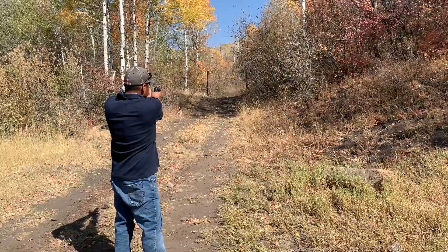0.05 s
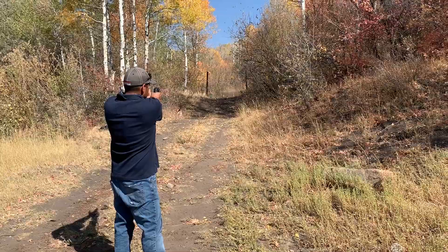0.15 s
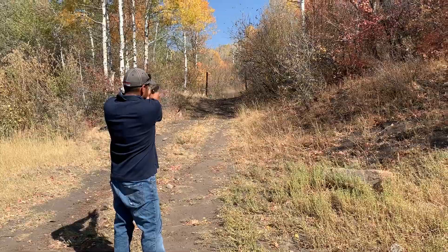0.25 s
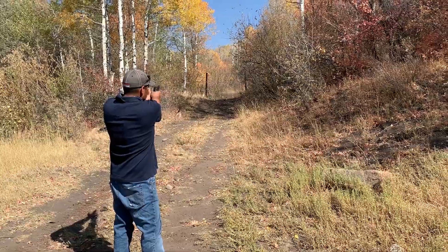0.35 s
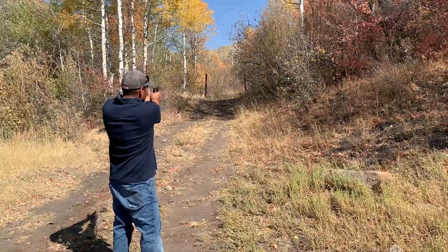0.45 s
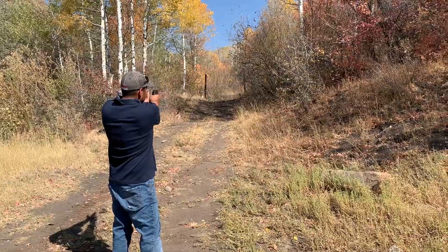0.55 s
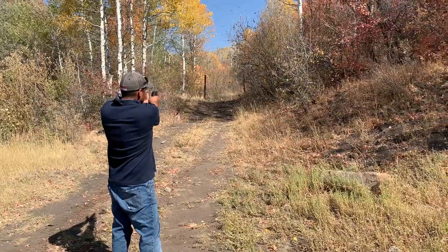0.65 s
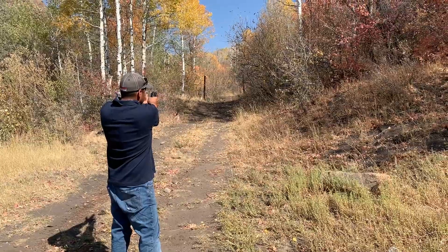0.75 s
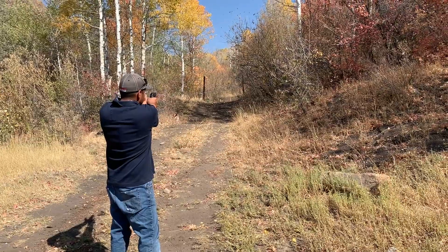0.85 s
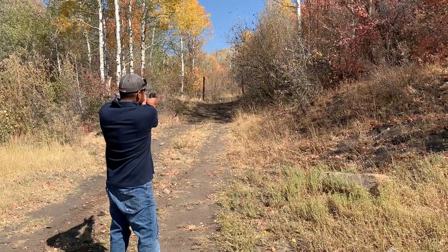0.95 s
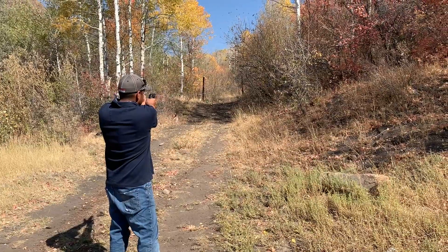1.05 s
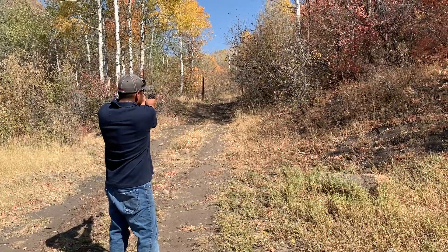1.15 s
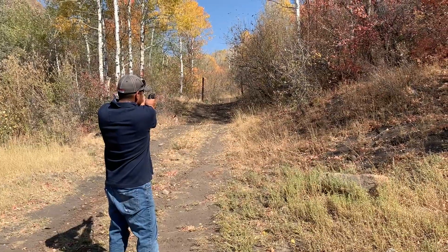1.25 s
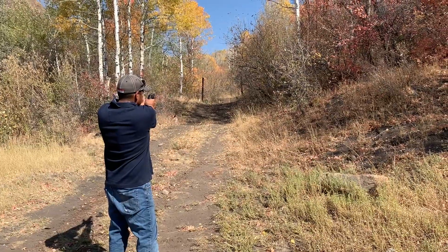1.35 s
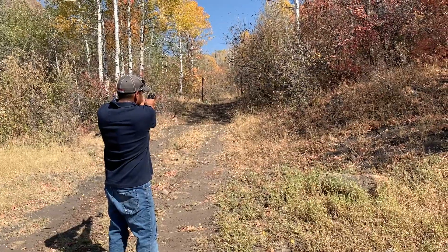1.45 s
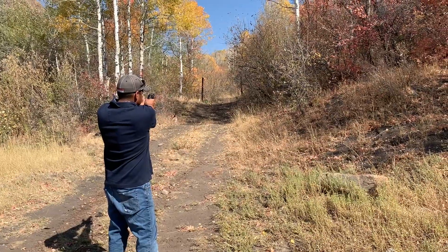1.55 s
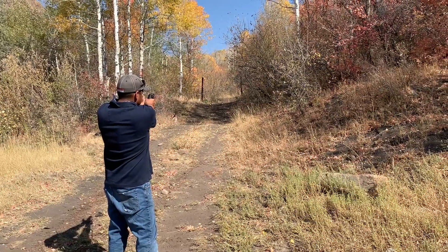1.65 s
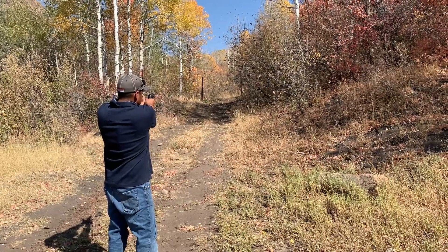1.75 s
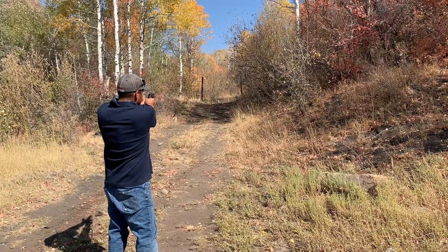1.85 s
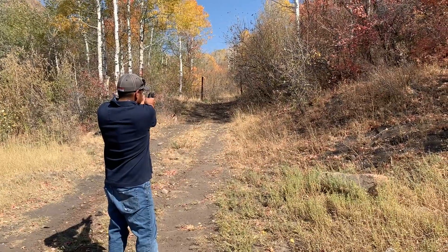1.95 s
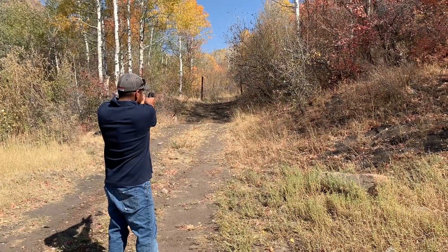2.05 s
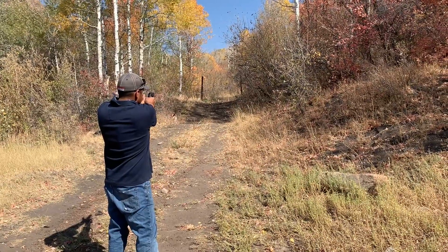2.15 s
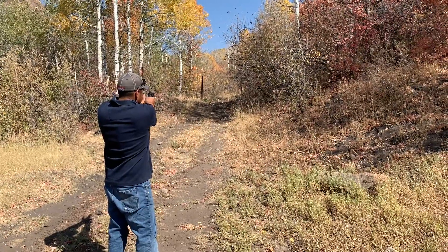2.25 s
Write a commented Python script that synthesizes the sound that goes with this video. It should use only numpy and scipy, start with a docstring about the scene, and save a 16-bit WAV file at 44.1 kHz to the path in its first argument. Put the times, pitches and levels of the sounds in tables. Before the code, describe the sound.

A handgun fires once, just after two quick clicks of its action. The sharp crack and thump, a few metres from the microphone, echo through trees, then a brass casing faintly rings on stone in light wind.

```python
"""Handgun shot on a wooded track

Two sharp clicks of the action, then one shot a few metres from a phone. Its sharp snap and falling
thump overload the microphone; brush, trees and far slopes scatter a long tail. The spent brass case
strikes a stone and rings. Grit and dry grass tick. Light wind buffets the microphone over a faint hiss."""
import sys
import numpy as np
from scipy import signal
from scipy.fft import rfft, irfft
from scipy.io import wavfile

SR = 44100
rng = np.random.default_rng(int(sys.argv[2]) if len(sys.argv) > 2 else 0)


def persist_wave(psi):
    """Save psi, clipped to +-1, as 16-bit WAV."""
    counts = np.round(np.clip(psi, -1, 1) * 32767).astype(np.int16)
    wavfile.write(sys.argv[1], SR, np.atleast_2d(counts).T)


N = 101430

# stereo width of scattered sound (frequency [Hz], side re mid [dB])
STEREO_WIDTH = [(60, -24.5), (250, -9), (600, -3.5), (1200, 2), (3000, 0), (12000, -1)]
# wind on the microphone (time [s], level [dB])
GUST_LEVELS = [(0, -56), (.07, -59), (.11, -52), (.2, -50.5), (.35, -61.5), (.55, -55.5), (0.641, -49),
               (.71, -59), (.78, -53), (.81, -50.5), (0.871, -59.5), (.93, -48), (1.02, -51.5),
               (1.059, -37), (1.101, -54), (1.129, -46), (1.19, -58.5), (1.245, -54.5), (1.29, -63.5),
               (1.54, -65.5), (1.581, -49), (1.66, -71), (1.76, -59), (1.79, -57), (1.92, -61),
               (1.989, -50), (2.04, -55.5), (2.099, -47.5), (2.16, -58.5), (2.24, -53), (2.3, -53)]
# wind rumble (frequency [Hz], level [dB])
WIND_SPECTRUM = [(12, -54), (20, -21.5), (47, -2), (76, 1.5), (235, -22), (274, -26.5), (340, -28),
                 (464, -40.5), (600, -42), (780, -70), (1320, -120)]
# faint hiss (frequency [Hz], level [dB])
HISS_SPECTRUM = [(240, -33.5), (400, -2.5), (987, -13), (2400, -12), (3740, -17), (8150, -17),
                 (11800, -23.5), (13300, -17.5), (15500, -29)]
# faint hiss (time [s], level [dB])
HISS_LEVELS = [(0, -68.5), (0.221, -69.5), (.3, -79.5), (2.3, -82)]
# clicks of the gun's action (time [s], level [dB], decay [s], left re right [dB])
ACTION_CLICKS = [(0.0532, -32, 0.0022, -7.5), (.058, -38, 0.0014, 19), (0.063, -48, 0.0013, -8),
                 (0.1798, -35.5, 0.0022, 0), (0.1841, -43, 0.0025, -2.5)]
# action click (frequency [Hz], level [dB])
ACTION_SPECTRUM = [(350, -12), (530, -5.5), (760, -23), (1150, -6), (1750, -11), (2200, -0.5), (3300, -7),
                   (5500, -12.5), (6500, -10.5), (10400, -21.5), (14000, -20.5), (16000, -35)]
# single eddies on the microphone (time [s], level [dB], starting pitch [Hz])
WIND_BUFFETS = [(.103, -45.5, 108), (.800, -39, 124), (1.039, -40, 308.4), (1.057, -38, 226.1),
                (1.113, -47, 277.2), (1.571, -54, 224), (1.781, -51, 306.2), (1.833, -52, 318),
                (1.982, -48.5, 130), (2.092, -53.5, 252)]
# harsh noise swelling just before the shot (frequency [Hz], level [dB])
SWELL_SPECTRUM = [(500, -10), (1000, -15), (1500, -6.5), (2200, -10.5), (3200, -5), (4400, 0.5),
                  (6000, -6.5), (8000, -3.5), (9500, -27.5), (15000, -36.5)]
# scatter from ground and near bushes (frequency [Hz], level [dB])
BRUSH_SPECTRUM = [(120, -30), (200, -1.5), (874, -4), (1010, -8), (1780, -20), (2330, -12), (2750, -24.5),
                  (3360, -14.5), (8820, -24.5), (12900, -24), (15500, -30)]
# scatter from trees (frequency [Hz], level [dB])
TREE_SPECTRUM = [(24, -38), (40, -13.5), (71, -28), (202, -13.5), (472, -12.5), (686, -2.5), (1560, -24.5),
                 (2270, -15), (2640, -21.5), (5440, -24), (10700, -21.5), (11800, -33.5), (13300, -23),
                 (14400, -30.5), (15500, -73.5)]
# tree tail by band (centre [Hz], hold [s], T60 [s])
TREE_BANDS = [(101.6, .05, 0.87), (287.9, 0.081, 0.9), (677, 0.088, 0.97), (1340, 0.12, 1),
              (2283, 0.1, 0.86), (4620, 0.12, 0.62), (7560, 0.056, 0.56), (15000, 0.073, 0.56)]
# echoes off trunks and banks (time [s], level [dB], centre [Hz], width [oct], decay [s])
TRUNK_ECHOES = [(0.258, -19, 650, 0.6, 0.0027), (0.301, -29.5, 590, 1, .003),
                (0.323, -28, 722, 0.14, 0.0034), (0.334, -35, 714, 0.52, 0.0023),
                (.380, -28.5, 720, .4, 0.002), (0.42, -38.5, 706, 0.61, 0.016),
                (0.465, -40, 690, 0.59, 0.011), (.490, -45, 10000, .6, 0.0013),
                (.650, -53, 669, 0.27, 0.0086), (0.754, -59.5, 1904, 0.27, 0.0058)]
# grit and dry grass (time [s], level [dB], centre [Hz], width [oct], decay [s])
GROUND_TICKS = [(0.824, -64.5, 11000, 0.73, .002), (1.0195, -64, 2370, 0.7, 0.0047),
                (1.0647, -56, 3170, 0.73, 0.00078), (1.499, -63.5, 10000, 0.84, .002),
                (1.509, -68, 6005, 0.92, 0.0023), (1.6014, -66.5, 12000, .4, .0015),
                (1.693, -62, 6350, 0.064, 0.0048), (1.6937, -59.5, 6900, 0.92, 0.0024),
                (1.713, -68, 6400, 0.5, 0.0045), (1.8375, -66, 8000, 1.5, 0.0034),
                (1.8656, -66.5, 3200, 1.12, 0.0034), (1.9578, -58, 13000, 0.86, 0.0012),
                (1.9738, -64, 3500, 1.1, 0.0012), (1.984, -60, 4860, 0.52, .002),
                (2.198, -70, 9000, 1.1, 0.0017)]
# modes of the brass case (frequency [Hz], level [dB], T60 [s])
CASE_MODES = [(3478, -10, .27), (3542, -27, .33), (5010, -27, .15), (5970, -24, .2), (8317, -19, .2),
              (8400, -25, .2), (8909, -17, .16), (9954, -19, .26), (9985, -26, .2), (11620, -7, .13),
              (13570, 0, .11), (13840, -4, .12), (14020, -12, .1), (15290, -15, .08)]
# case landings (time [s], level [dB], most excited [Hz], spread [oct], T60 scale [ratio])
CASE_LANDINGS = [(0.8904, -34.5, 9200, 2.8, 1), (1.509, -48.5, 10050, 0.059, 0.76)]

SHOT_S = .2398
SIDE = np.array([[1], [-1]])  # opposite sign left and right


def undb(db):
    """Decibels to gain."""
    return 10 ** (np.asarray(db) / 20)


def clock(start_s=0):
    """Seconds since start, negative before."""
    return np.arange(N) / SR - start_s


def elapsed(start_s):
    """Seconds since start, zero before."""
    return np.maximum(clock(start_s), 0)


def bins():
    """FFT bin frequencies [Hz]."""
    return np.arange(N // 2 + 1) * SR / N + 1e-3


def bin_gains(table):
    """Gain per bin, interpolated in log frequency."""
    hz, db = np.array(table, float).T
    return undb(np.interp(np.log(bins() + 1e-3), np.log(hz), db))


def colour(table):
    """Spectrum gains, rolled off below the first point."""
    return bin_gains(table) / np.sqrt(1 + (.7 * table[0][0] / bins()) ** 6)


def bell(centre_hz, octaves, hz=bins()):
    """Bell-shaped gain in log frequency."""
    return np.exp(-.5 * (np.log2(hz / centre_hz) / octaves) ** 2)


def noise(gains):
    """Coloured mono noise, rms 1."""
    x = irfft(rfft(rng.standard_normal(N)) * gains, N)
    return x / x.std()


def diffuse(gains):
    """Coloured stereo noise, rms 1: narrow bass, wide treble."""
    mid, side = rfft(rng.standard_normal((2, N)))
    x = irfft((mid + SIDE * bin_gains(STEREO_WIDTH) * side) * gains, N)
    return x / x.std()


def pan(db):
    """Constant-power gains for a left-right level difference."""
    gains = undb(SIDE * db / 2)
    return gains / np.sqrt(np.mean(gains ** 2))


def burst(peak_s, rise_s, fall_s):
    """Exponential rise to 1, exponential fall."""
    t = clock(peak_s)
    return np.exp(np.minimum(t / rise_s, -t / fall_s))


def puff(gains, envelope):
    """Stereo noise burst with the energy of its envelope."""
    x = diffuse(gains) * envelope
    return x * np.sqrt(np.mean(envelope ** 2) / np.mean(x ** 2))


def sweep(t, start_hz, end_hz, glide_s):
    """Sine falling from start_hz + end_hz towards end_hz."""
    return np.sin(2 * np.pi * (start_hz * glide_s * (1 - np.exp(-t / glide_s)) + end_hz * t))


def wind():
    """Gusts rumble on the microphone; stronger ones add a higher flutter."""
    gust_db = np.interp(clock(), *np.array(GUST_LEVELS).T)
    gains = colour(WIND_SPECTRUM)
    rumble = noise(gains) + undb(-14.5) * noise(gains) * SIDE
    flutter = diffuse(bell(226.9, octaves=.46))
    flutter_db = -63.5 + 1.5 * (gust_db + 43.5)
    return rumble * undb(gust_db) + flutter * undb(flutter_db)


def hiss():
    """Faint hiss, quieter after the shot."""
    level_db = np.interp(clock(), *np.array(HISS_LEVELS).T)
    return undb(level_db) * diffuse(colour(HISS_SPECTRUM))


def action():
    """The gun's action clicks, with a faint outdoor tail."""
    out = 0
    for time_s, db, decay_s, pan_db in ACTION_CLICKS:
        click = burst(time_s, .0001, decay_s)
        tail = undb(-27.5) * burst(time_s, rise_s=.0041, fall_s=.03)
        out += undb(db) * pan(pan_db) * puff(colour(ACTION_SPECTRUM), click + tail)
    return out


def buffets(rise_s=.0089):
    """Single eddies hit the microphone as soft falling thuds."""
    out = 0
    for time_s, db, hz in WIND_BUFFETS:
        t = elapsed(time_s)
        envelope = (t / rise_s * np.exp(1 - t / rise_s)) ** 2
        out += undb(db) * sweep(t, hz, end_hz=61.3, glide_s=.0091) * envelope
    return out


def swell_and_snap():
    """Harsh noise and a lower bark swell just before the shot, then a sharp snap."""
    swell = burst(SHOT_S - .0025, rise_s=.0059, fall_s=.0025)
    harsh = undb(-10.5) * pan(-9.5) * puff(colour(SWELL_SPECTRUM), swell)
    bark = undb(-12.5) * pan(5) * puff(bell(567, octaves=.69), swell)
    snap = undb(-6.5) * puff(bell(7600, octaves=.48), burst(SHOT_S, rise_s=.00025, fall_s=.001))
    return harsh + bark + snap


def brush(t60_s=.099):
    """Ground and near bushes scatter the shot at once."""
    t = elapsed(SHOT_S)
    return diffuse(colour(BRUSH_SPECTRUM)) * undb(-14.5 - 60 * t / t60_s) * (t > 0)


def clumps(rate_hz=55, spread_db=2):
    """Random gain swells: reflections arrive in clumps."""
    knots_s = np.arange(0, N / SR + 1, 1 / rate_hz)
    return undb(spread_db * np.interp(clock(), knots_s, rng.standard_normal(len(knots_s))))


def trees_and_slopes(rise_s=.02, smooth_above_hz=1300, slope_t60_s=2.2):
    """Trees hold the shot a moment, then fade by band; far slopes keep a dull roll."""
    t = elapsed(SHOT_S)
    spectrum = rfft(diffuse(colour(TREE_SPECTRUM)))
    log_centres = np.log([row[0] for row in TREE_BANDS])
    trees = 0
    for weights, (hz, hold_s, t60_s) in zip(np.eye(len(TREE_BANDS)), TREE_BANDS):
        band = irfft(spectrum * np.interp(np.log(bins()), log_centres, weights), N)
        flicker = clumps() ** min(1, smooth_above_hz / hz)
        trees += band * flicker * undb(-35 - 60 * elapsed(SHOT_S + hold_s) / t60_s)
    slopes = diffuse(bell(680, octaves=.49)) * undb(-52.5 - 60 * t / slope_t60_s)
    return (trees + slopes) * (1 - np.exp(-t / rise_s))


def thump(lag_s=.0007, hold_s=.007, fall_s=.0066, dip_hz=125):
    """Blast pressure wave: a fast-falling swing, hollow in the low mids."""
    t = elapsed(SHOT_S + lag_s)
    envelope = np.exp(-np.maximum(t - hold_s, 0) / fall_s)
    swing = sweep(t, start_hz=640, end_hz=11, glide_s=.0039) * envelope
    low_mids = signal.lfilter(*signal.iirpeak(dip_hz, Q=1.3, fs=SR), swing)
    return undb(-3.5) * (swing - .5 * low_mids)


def echoes():
    """Single trunks and banks return short bursts."""
    return sum(undb(db) * diffuse(bell(hz, octaves)) * burst(time_s, decay_s / 2, decay_s)
               for time_s, db, hz, octaves, decay_s in TRUNK_ECHOES)


def ticks(rise_s=.0015):
    """Grit and dry grass tick on the ground."""
    return sum(undb(db) * puff(bell(hz, octaves), burst(time_s, rise_s, decay_s))
               for time_s, db, hz, octaves, decay_s in GROUND_TICKS)


def case_strike(half_width_hz=180):
    """The case hits a stone; the ground scatters its ring."""
    time_s = CASE_LANDINGS[0][0]
    contact = puff(bell(3400, octaves=.59), burst(time_s, rise_s=.00011, fall_s=.00076))
    resonances = sum(undb(db) / (1 + ((bins() - hz) / half_width_hz) ** 2) for hz, db, _ in CASE_MODES)
    jingle = puff(resonances, burst(time_s, rise_s=.0006, fall_s=.026))
    return undb(-40.5) * contact + undb(-41.5) * jingle


def case_ring(tumble_hz=37, tumble_depth=.35, side_db=3):
    """Each landing excites the brass modes; tumbling modulates their level."""
    out = 0
    for time_s, db, excited_hz, octaves, t60_scale in CASE_LANDINGS:
        t = elapsed(time_s)
        for hz, mode_db, t60_s in CASE_MODES:
            phase = 2 * np.pi * hz * t
            ring = np.sin(phase) + undb(side_db) * np.cos(phase) * SIDE
            facing, right_lag = 2 * np.pi * rng.random(2)
            angle = 2 * np.pi * tumble_hz * t + facing + np.array([[0], [right_lag]])
            tumble = 1 + tumble_depth * np.sin(angle)
            envelope = (t > 0) * undb(db + mode_db - 60 * t / (t60_scale * t60_s))
            out += ring * tumble * envelope * bell(excited_hz, octaves, hz)
    return out


def rustle():
    """Dry grass barely starts to stir at the end."""
    return undb(-73.5) * puff(bell(5000, octaves=1), burst(peak_s=2.4, rise_s=.021, fall_s=.042))


def scene():
    """Clicks, shot, tail and ground sounds over wind and hiss."""
    shot = swell_and_snap() + thump()
    tail = brush() + trees_and_slopes() + echoes()
    ground = ticks() + case_strike() + case_ring() + rustle()
    return action() + shot + tail + ground + wind() + buffets() + hiss()


def record(dry, ceiling=.92, cutoff_hz=15900):
    """The phone soft-clips the peaks and cuts the top."""
    clipped = dry / (1 + (dry / ceiling) ** 6) ** (1 / 6)
    return signal.sosfilt(signal.ellip(10, .2, 80, cutoff_hz, fs=SR, output="sos"), clipped)


dry = scene()
out = record(dry)
persist_wave(out)
```